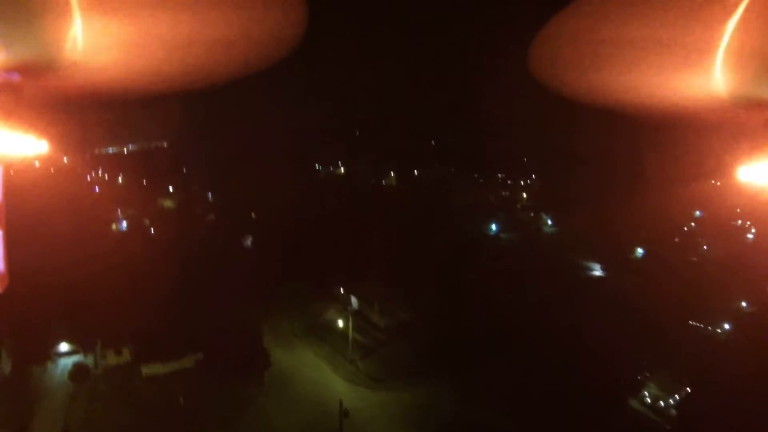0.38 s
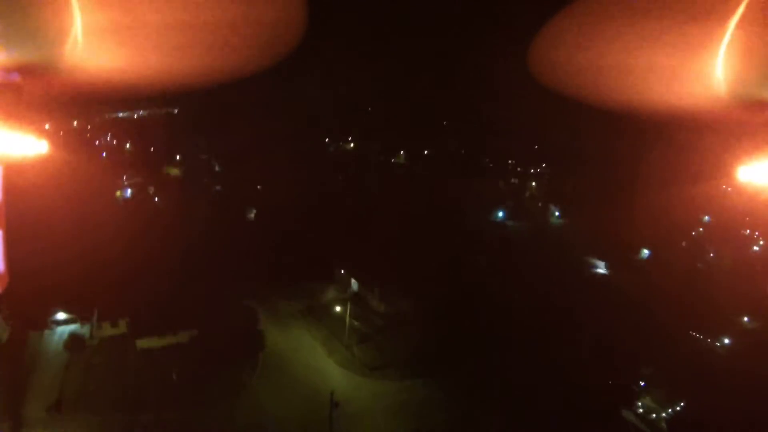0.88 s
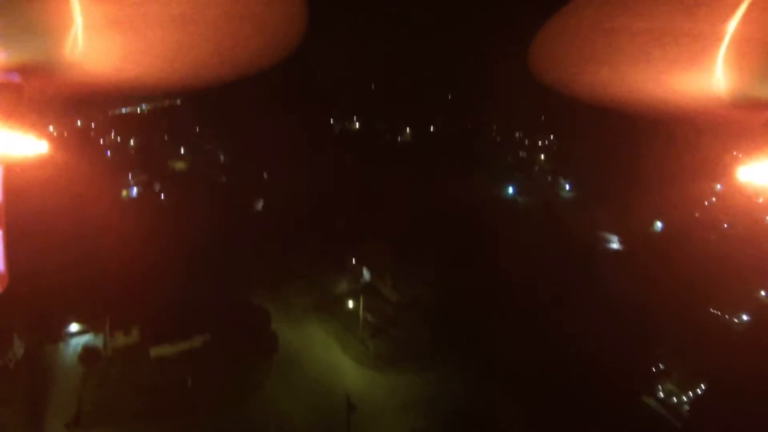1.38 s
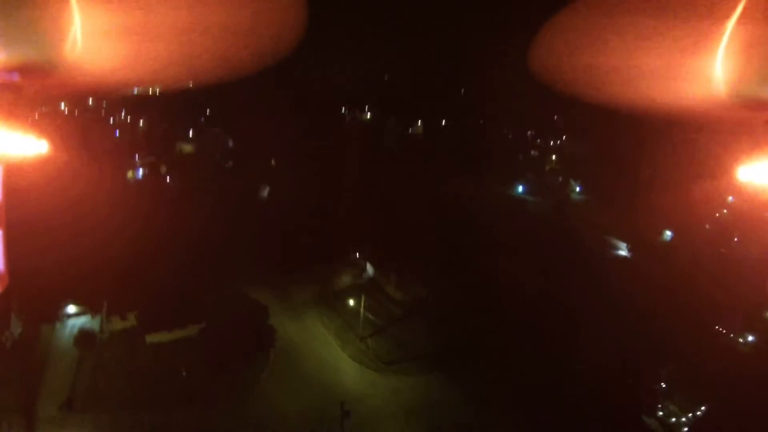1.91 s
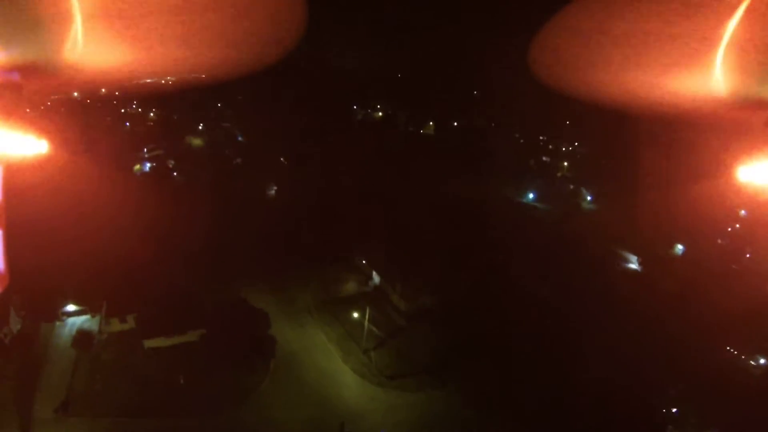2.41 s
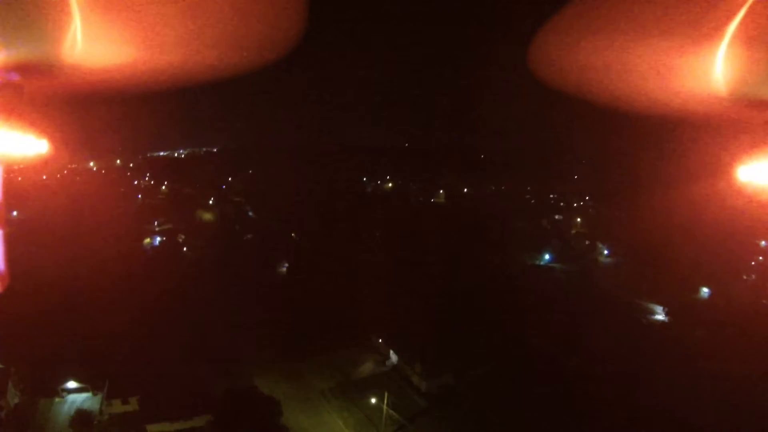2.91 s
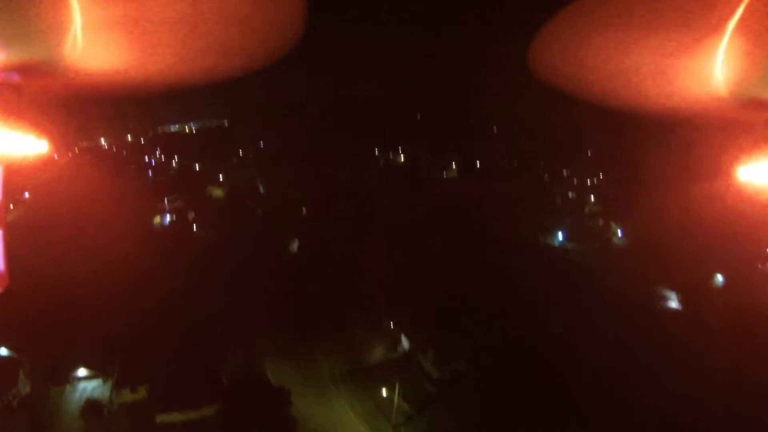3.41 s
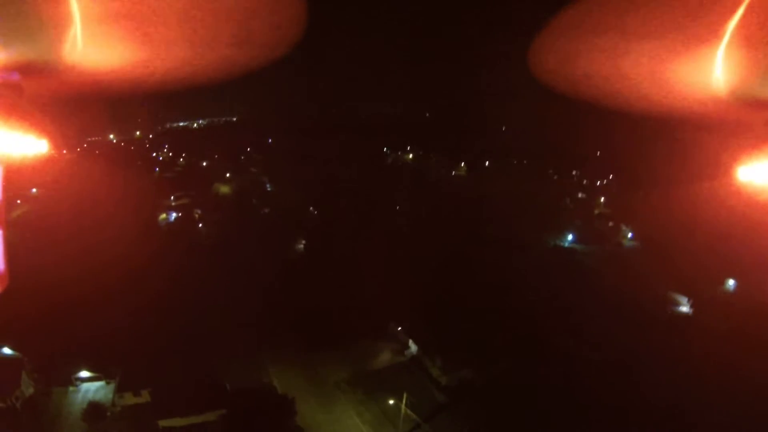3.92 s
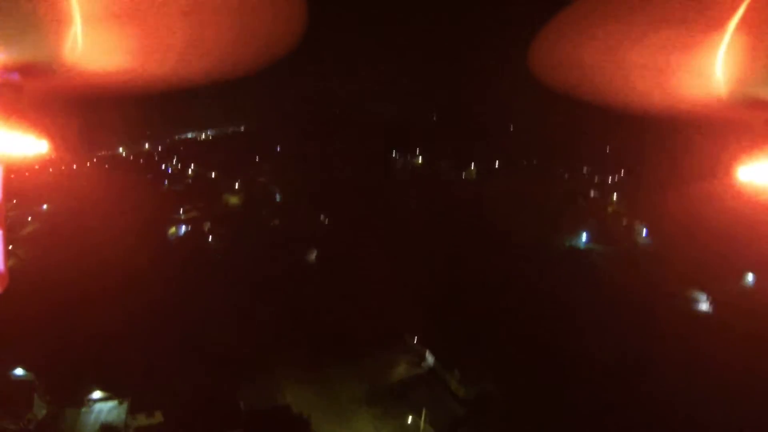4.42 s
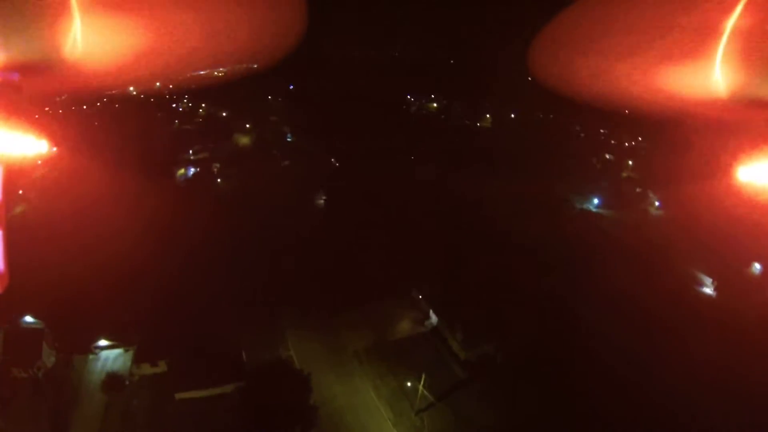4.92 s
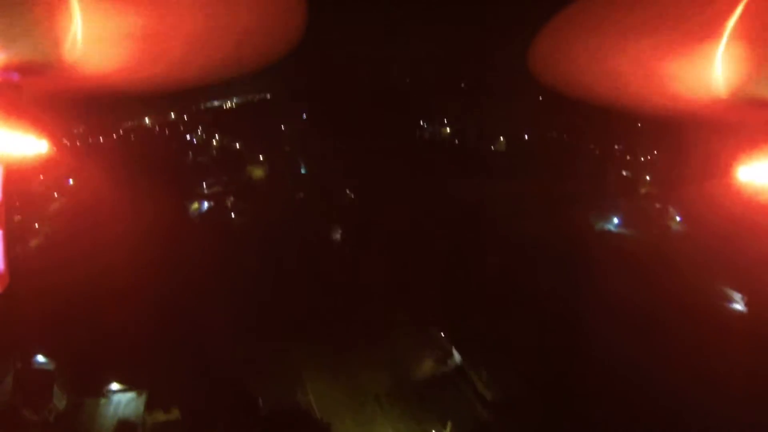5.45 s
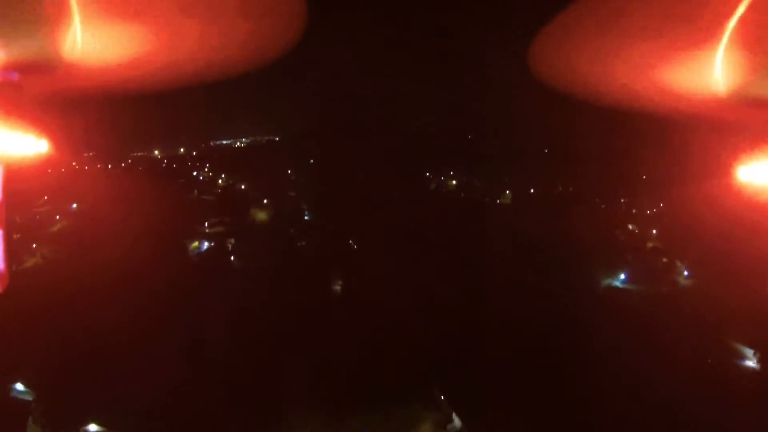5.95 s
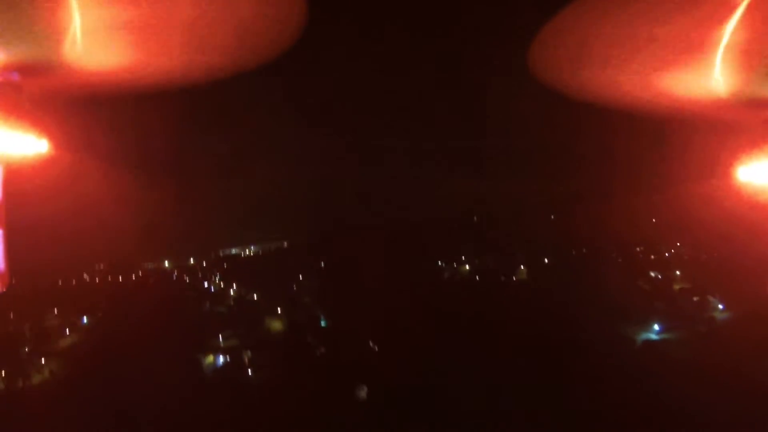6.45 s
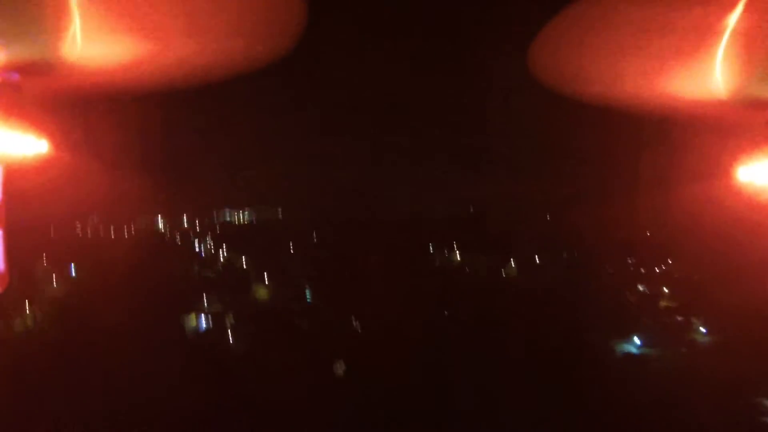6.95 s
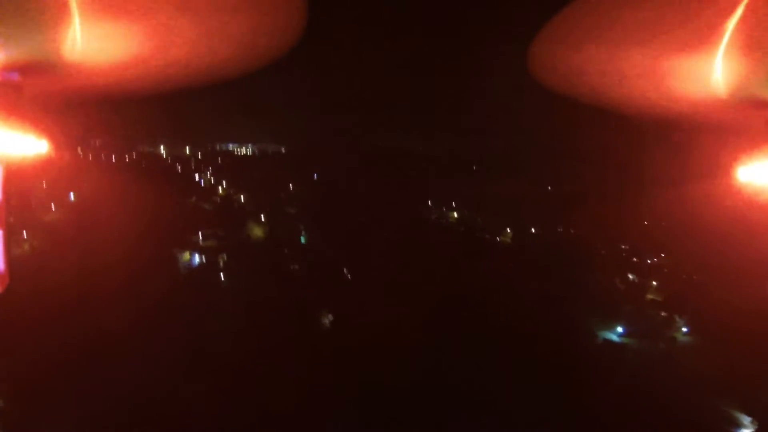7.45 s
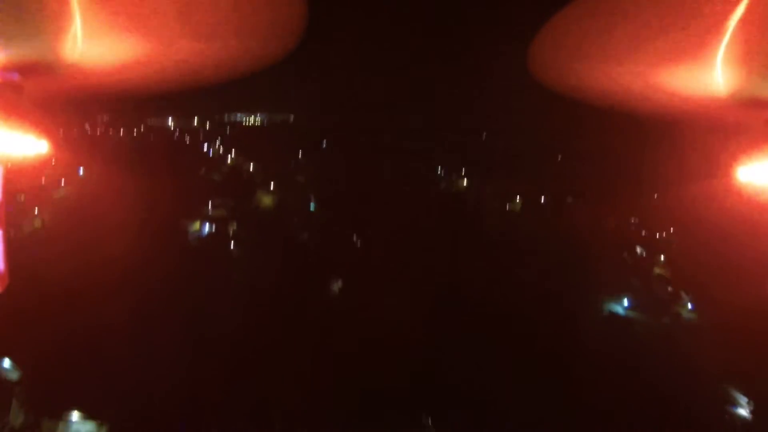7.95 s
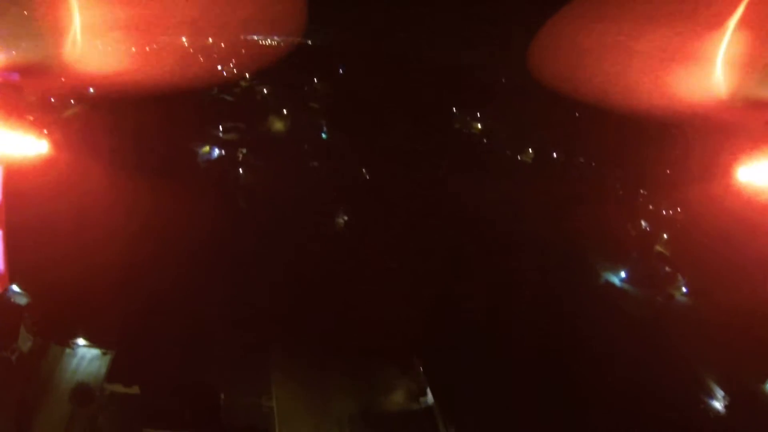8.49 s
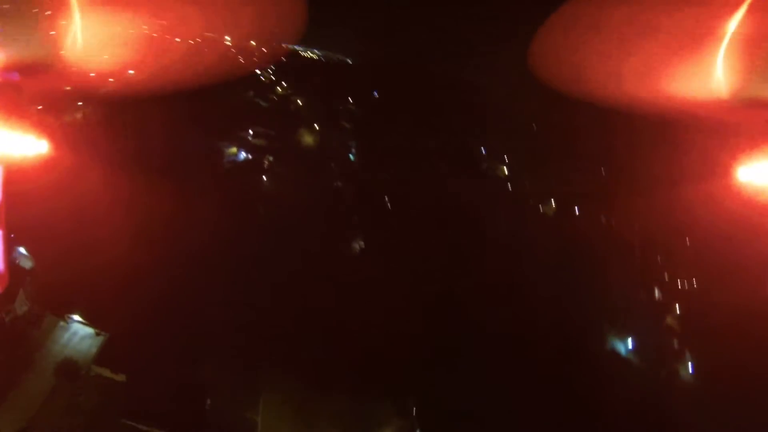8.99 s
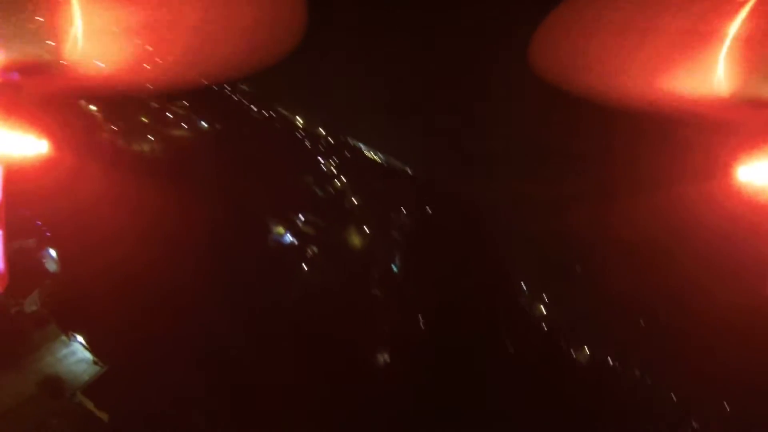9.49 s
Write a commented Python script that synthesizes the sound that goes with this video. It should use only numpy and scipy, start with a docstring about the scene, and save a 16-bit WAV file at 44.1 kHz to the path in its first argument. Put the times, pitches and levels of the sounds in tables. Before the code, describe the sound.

A small four-rotor drone flies at night, heard by a microphone mounted under its arms, very close and dry, for about 9.6 seconds. From the first instant the nearest propeller beats puffs of air on the microphone, a low buzzing throb around 130 beats a second, wavering slightly in pitch. Windy rumble, flutter and raspy wash swell and fade irregularly; the beat is smooth in calm spells and breaks up in gusts. A thin whine near 8 kHz and airy hiss rise and sink together beneath it. From about 2.7 s scattered pops appear, with more near 4.3 and 5.8 s. Around 6.4 to 6.7 s they crowd into a loud, crackling, buffeting burst, with another pop near 7. Afterwards they thin out, the whine and hiss peak near 8.5 s, a few thuds and pops follow, and the throbbing continues to the end.

```python
"""A small four-rotor drone in flight, heard by a microphone under its arms, for about 9.6 s.
From the start the nearest propeller beats a puff of air per blade on the microphone port.
Rumble, flutter and rasp swell and fade on their own; the beat is steady in calm spells and breaks up in gusts.
A whine near 8 kHz and a frame hiss come and go together, strongest near 8.5 s.
Scattered pops join from about 2.7 s, crowd together near 6.5 s, then thin out.
Puffs are summed cosines, wash and hiss shaped noise, the whine pure tones."""
import sys
import numpy as np
from scipy import signal
from scipy.fft import rfft, irfft
from scipy.io import wavfile

SR = 44100
rng = np.random.default_rng(int(sys.argv[2]) if len(sys.argv) > 2 else 0)


def store_wav(level_fs):
    """Save 16-bit WAV to argv[1]."""
    pcm = np.round(np.clip(np.atleast_2d(level_fs), -1, 1) * 32767)
    wavfile.write(sys.argv[1], SR, pcm.T.astype(np.int16))


def volts_from_decibels(level):
    """Turn decibel levels (scalar or array-like) into linear amplitude factors."""
    exponent = np.asarray(level, float) / 20
    return 10 ** exponent


N = 423801  # length in samples

# How each puff is shaped: start_s, lean_turns (0 pressure peaks, 0.25 saw, 0.5 suction dips; whole turns repeat),
# cling_db (how tightly the rasp clings to each blade), sharpness (0-1, before chance),
# wobble_db (once-a-turn wobble, before chance)
PUFF_SHAPE = [(0, 0.51, 0.86, .28, -29), (.5, 0.41, 3, 0.31, -33), (.8, 0.68, 1.8, 0.48, -41),
              (1.3, 0.56, 1.8, 0.32, -42), (1.8, 1.2, 2.6, 0.25, -34), (2.2, 0.86, 2.4, 0.27, -28),
              (2.5, 1.07, 2.9, .3, -33), (2.65, 0.91, 13, 0.36, -35), (3.02, 1.05, 7.5, 0.53, -38),
              (3.2, 0.91, 4.1, .3, -24), (3.7, 1.01, 6.4, 0.34, -32.5), (4.2, 1.4, 2.7, 0.25, -24),
              (4.6, 1.36, 1.6, .24, -30), (5.1, 1.61, 1.3, 0.15, -24), (5.55, 2.03, 7.5, .5, -28),
              (5.95, 1.96, 6, 0.55, -35), (6.1, 2.25, 4, 0.35, -39), (6.4, 1.87, 4, 0.21, -40),
              (6.52, 1.63, 7.1, .22, -31), (6.7, 1.47, 6, 0.33, -36), (6.8, 1.8, 3.5, 0.43, -24),
              (7.0, 1.94, 3, 0.34, -38), (7.4, 2.3, 3.7, 0.33, -24.5), (8.0, 2.42, 2.6, 0.44, -26),
              (8.8, 2.54, 2.7, 0.47, -27.5), (9.2, 1.8, 1.9, .25, -27), (9.6, 2.43, 2, 0.36, -30)]
# Turbulent wash, before trims and chance: start_s, rasp_db (small eddies), flutter_db (middling eddies)
WASH_LEVELS = [(0.0, -30, -28), (0.02, -34.5, -28.5), (0.43, -30.5, -24), (0.45, -34, -18.5),
               (0.53, -35, -21), (1.04, -31, -27), (1.15, -36, -29), (1.18, -24, -27), (1.23, -37, -20.5),
               (1.31, -28, -24), (1.5, -37, -22), (1.63, -37, -23.5), (1.79, -44.5, -24.5),
               (1.85, -32.5, -29), (1.98, -30, -22.5), (2.03, -33.5, -27), (2.27, -29, -19.5),
               (2.51, -35, -20.5), (2.68, -39.5, -26.5), (2.84, -38, -27), (2.89, -41.5, -28),
               (3.29, -32.5, -21), (3.56, -40, -25.5), (3.91, -34.5, -22.5), (4.36, -38, -23),
               (4.39, -36, -28), (4.68, -29, -24), (5.67, -36, -22.5), (5.91, -30, -27.5),
               (6.05, -35.5, -29.5), (6.66, -22.5, -24), (6.72, -30.5, -25), (6.74, -47, -32),
               (6.8, -36, -27), (6.9, -41, -32.5), (6.96, -33.5, -24), (7.09, -39, -30.5),
               (7.33, -35.5, -26.5), (7.49, -41.5, -31), (8.65, -42, -28.5), (8.91, -35, -25.5),
               (8.94, -38.5, -22.5), (9.13, -38.5, -30), (9.21, -30.5, -28.5), (9.58, -34.5, -24.5),
               (9.61, -35, -26.5)]


def rms_one(x):
    """Scale a signal to an rms of 1."""
    return x / np.sqrt(np.mean(x ** 2) + 1e-20)


def in_time(rows):
    """Draw straight lines between the rows of a table, one curve for each column after the time."""
    start_s, *columns = np.transpose(rows)
    return [np.interp(np.arange(N) / SR, start_s, column) for column in columns]


def drift(rate_hz):
    """Slow chance: white noise through a double one-pole low-pass; spread 1."""
    r = np.exp(-2 * np.pi * rate_hz / SR)
    slow = signal.lfilter([1], [1, -2 * r, r * r], rng.standard_normal(N + SR))
    return rms_one(slow[SR:])  # skip the first second, while the filter settles


def phase(hz):
    """Add up a changing frequency into an angle in radians."""
    return 2 * np.pi * np.cumsum(hz) / SR


def coloured(x, spectrum, weight=lambda hz: 1):
    """Filter x by a spectrum of (Hz, dB) points, times a further weight; rms 1."""
    hz = np.maximum(np.arange(N // 2 + 1) * SR / N, 1)
    point_hz, point_db = np.transpose(spectrum)
    gain = volts_from_decibels(np.interp(np.log(hz), np.log(point_hz), point_db)) * weight(hz)
    return rms_one(irfft(rfft(x) * gain, N))


def puffs(turn):
    """Two blades push two puffs a turn, sharpened at crest, flank or trough; unequal blades add a wobble."""
    # Blade tone before trim and chance: start_s, tone_db
    tone_levels = [(0.0, -30.5), (0.08, -17), (0.56, -20), (0.59, -28), (0.77, -20), (1.68, -16.5),
                   (1.79, -16), (1.87, -30), (2.17, -20.5), (2.22, -29), (2.57, -15), (3.13, -18.5),
                   (3.18, -26), (3.34, -15.5), (3.82, -16), (3.88, -36), (3.96, -17.5), (4.01, -24),
                   (4.09, -12.5), (4.15, -24), (4.34, -17), (4.39, -24), (4.66, -19), (5.3, -23.5),
                   (5.54, -14.5), (5.81, -19), (6.23, -15), (6.37, -30), (6.4, -25), (6.45, -27),
                   (6.56, -20), (6.66, -24), (7.23, -16), (7.47, -19.5), (8.32, -17.5), (8.35, -23.5),
                   (8.91, -21.5), (8.94, -22), (8.99, -14), (9.26, -29), (9.58, -15.5), (9.61, -21.5)]
    # The tone's octave, which leads the overtones, before trim and chance: start_s, octave_db
    octave_levels = [(0.0, -23.5), (0.35, -31.5), (0.4, -16), (0.7, -26.5), (1.76, -22), (1.82, -37),
                     (1.98, -20), (2.09, -44), (2.17, -23), (2.94, -19.5), (3.05, -27), (3.53, -23),
                     (3.64, -29.5), (3.77, -17.5), (3.82, -31), (3.99, -17.5), (4.01, -39), (4.28, -17.5),
                     (4.44, -35), (4.52, -26), (4.92, -30), (4.95, -38), (5.03, -21), (5.24, -32.5),
                     (5.27, -25.5), (5.94, -19.5), (6.32, -35), (6.66, -17), (6.74, -40), (6.82, -26.5),
                     (7.6, -29.5), (7.65, -23), (8.62, -21), (9.21, -34.5), (9.58, -23), (9.61, -28)]
    lean, cling_db, sharp, wobble_db = in_time(PUFF_SHAPE)
    tone_db = in_time(tone_levels)[0] + 0.35 + 1.0 * drift(16.0)
    octave_db = in_time(octave_levels)[0] - 1.5 + 2.5 * drift(4.6)
    wobble_db = wobble_db + 2.4 * drift(5.0)
    sharp = np.clip(sharp * (1 + 0.2 * drift(6.2)), 0, 0.8)

    overtones = np.zeros(N)
    for k in range(1, 5):
        overtones += sharp ** (k - 1) * np.cos((k + 1) * 2 * turn + k * 2 * np.pi * lean)
    blade = volts_from_decibels(tone_db) * np.cos(2 * turn) + volts_from_decibels(octave_db) * overtones
    wobble = np.cos(turn + 0.46 * drift(0.67)) + 0.19 * np.cos(3 * turn + drift(3.9))
    return np.sqrt(2) * (blade + volts_from_decibels(wobble_db) * wobble)


def wash(turn):
    """Eddies make lumpy noise; the small ones add sparse snaps, thickest just after each puff's sharp point."""
    # Large eddies, before trim and chance: start_s, rumble_db
    rumble_levels = [(0.0, -26.5), (1.01, -30.5), (1.07, -21), (1.31, -34), (1.36, -22.5), (1.6, -37.5),
                     (1.95, -26), (2.49, -27.5), (2.65, -46), (3.21, -28), (3.4, -43), (3.69, -33),
                     (3.77, -35), (4.01, -23), (4.07, -32.5), (5.3, -24.5), (5.62, -39), (5.7, -30),
                     (6.1, -39), (6.56, -27.5), (6.74, -30), (6.82, -22), (7.17, -29), (8.99, -23),
                     (9.07, -43), (9.15, -29), (9.39, -20), (9.45, -37), (9.5, -27), (9.61, -28)]
    # Colour of the wash, relative: pitch_hz, level_db (per Hz)
    wash_colour = [(15, -7), (25, 1), (50, 6), (100, 4.5), (200, 1.5), (310, -1.5), (500, -8.5),
                   (800, -14.5), (1250, -20.5), (2000, -28.5), (3150, -39), (5000, -50.5), (9000, -64.5)]
    rumble_top_hz, flutter_top_hz = 130, 812
    snaps_per_s = 1200  # before the blade wake thickens or thins them

    def below(hz, top_hz):
        return 1 / np.sqrt(1 + (hz / top_hz) ** 4)

    def above(hz, bottom_hz):
        return np.sqrt(1 - below(hz, bottom_hz) ** 2)

    rasp_db, flutter_db = in_time(WASH_LEVELS)
    rumble_db = in_time(rumble_levels)[0]
    lean, cling_db = in_time(PUFF_SHAPE)[:2]
    white = rng.standard_normal((3, N))

    # The wake peaks 0.7 radian after the sharp point
    wake_db = cling_db * (np.cos(2 * turn + 2 * np.pi * lean - 0.7) - 0.6)
    gusts_db = 0.72 * drift(28) + 3.7 * drift(290)
    snap_here = rng.random(N) < snaps_per_s * volts_from_decibels(wake_db) / SR
    snap_size = volts_from_decibels(2.3 * np.minimum(rng.exponential(1, N), 2.5))
    snaps = rms_one(snap_here * snap_size * np.sign(white[2]))
    eddies = white[1] * volts_from_decibels(0.44 * gusts_db + 0.62 * wake_db)
    tearing = volts_from_decibels(gusts_db + wake_db) * (snaps + 1.07 * white[1])

    rumble = coloured(white[0], wash_colour, lambda hz: below(hz, rumble_top_hz))
    flutter = coloured(eddies, wash_colour, lambda hz: above(hz, rumble_top_hz) * below(hz, flutter_top_hz))
    rasp = coloured(tearing, wash_colour, lambda hz: above(hz, rumble_top_hz) * above(hz, flutter_top_hz))

    lumps = drift(11.5)  # flutter and rasp share these chance lumps
    rumble = volts_from_decibels(rumble_db + 5.5 + 2 * drift(4.3)) * rumble
    flutter = volts_from_decibels(flutter_db + 3.5 + 1.28 * lumps) * flutter
    rasp = volts_from_decibels(rasp_db + 2.5 + 1.23 * lumps) * rasp
    return rumble + flutter + rasp


def pops(turn):
    """In a passing vortex pressure builds one way, flips across the core and relaxes; suction dips are bells."""
    # Strongest tip vortices, before the port dulls them: start_s, jump_db, direction (+1 up, -1 down)
    strong_vortices = [(2.659, -11, -1), (3.393, -11.5, -1), (3.4287, -11.5, -1), (3.8716, -11, -1),
                       (4.2748, -13, 1), (4.3083, -10.5, 1), (5.548, -13, 1), (5.787, -8, -1),
                       (5.849, -17, 1), (5.9278, -9.5, -1), (6.0065, -11, 1), (6.359, -13, 1),
                       (6.4412, -4, -1), (6.4827, -9, 1), (6.512, -3, -1), (6.52, -3, 1), (6.534, -5, -1),
                       (6.5459, -1, 1), (6.5686, -5, -1), (6.585, -2.5, -1), (6.6102, -2, -1),
                       (6.656, 0, -1), (6.7987, -15, 1), (6.9691, -5, -1), (8.6588, -11, 1),
                       (9.063, -12.5, 1), (9.071, -13, -1)]
    # Deep suction as a gust seals the port, before dulling: start_s (centre), depth_db, width_ms
    suction_dips = [(6.5473, 6, 0.53), (6.5797, -0.5, 0.89), (6.6586, -7, 0.57), (6.666, -12, 0.71),
                    (8.477, 3, 0.86), (8.6622, 0.5, 0.48), (9.182, -3, 1), (9.241, -2.5, 1),
                    (9.367, -2, 0.56), (9.504, -18, 0.48)]
    core_ms, reach_ms = 0.074, 0.72
    port_cut_hz = 3500
    shed_db, shed_per_cling = 0.5, 0.83  # small vortices against the rasp table; growth per dB of cling
    shed_spread_db, shed_jitter_ms = 7, 0.4

    rasp_db = in_time(WASH_LEVELS)[0]
    lean, cling_db = in_time(PUFF_SHAPE)[:2]
    jumps, ms = np.zeros(N), np.arange(-200, 201) / SR * 1000

    # Each blade sheds one small vortex, about 1.2 radians after the puff's sharp point
    blade_count = np.floor((2 * turn - 1.2) / (2 * np.pi) + lean)
    passes = np.flatnonzero(np.diff(blade_count) > 0)
    late, strength = rng.standard_normal((N // 200, 2))[:len(passes)].T
    at = np.clip(passes + (late * shed_jitter_ms * SR / 1000).astype(int), 0, N - 1)
    small_db = (rasp_db + shed_db + shed_per_cling * cling_db)[passes]
    jumps[at] = -volts_from_decibels(small_db + shed_spread_db * np.clip(strength, -2, 1.4))

    for start_s, jump_db, direction in strong_vortices:
        jumps[round(start_s * SR)] += np.sign(direction) * volts_from_decibels(jump_db)
    flip = np.tanh(ms / core_ms) * np.exp(-2 * np.hypot(ms, core_ms) / reach_ms)
    out = signal.fftconvolve(jumps, flip, "same")

    for start_s, depth_db, width_ms in suction_dips:
        at = round(start_s * SR)
        out[at - 200:at + 201] -= volts_from_decibels(depth_db) / np.cosh(ms / width_ms) ** 2
    # The port cavity dulls them
    return signal.sosfilt(signal.butter(2, port_cut_hz, fs=SR, output="sos"), out)


def whine(near, far):
    """Speed controllers switch at fixed pitches; motor poles add side tones that move with shaft speed."""
    # Switching tones, before trim and chance: pitch_hz, level_db (against the treble level)
    switching = [(7487, -29), (7503, -31), (7636, -28), (7652, -29), (7978, -14), (7995.5, -19),
                 (8011.7, -16), (8053.4, -4), (8069.6, -8.5), (8127.4, -18), (8143.6, -18), (8184, -28),
                 (8209.5, -29)]
    # Distance of the side tones from their carrier: order (multiples of shaft speed)
    pole_orders = [-42, -14, 14]
    # Side tones of the near and the far rotor, before chance: level_db (against the treble level), one per order
    near_side_db = [-17, -13.5, -27]
    far_side_db = [-17, -15, -27]
    near_carrier_hz, far_carrier_hz = 8053.4, 8069.6

    t = np.arange(N) / SR
    out = np.zeros(N)
    for pitch_hz, level_db in switching:
        level = volts_from_decibels(level_db + 0.5 + 2.6 * drift(4.6))
        angle = 2 * np.pi * pitch_hz * t + 0.36 * drift(2.9) + rng.uniform(0, 7.3)
        out += level * np.cos(angle)

    rotor_tones = ((near_carrier_hz, near, near_side_db), (far_carrier_hz, far, far_side_db))
    for carrier_hz, speed, side_db in rotor_tones:
        for order, level_db in zip(pole_orders, side_db):
            angle = phase(carrier_hz + order * speed) + 0.3 * drift(15)
            out += volts_from_decibels(level_db + 3.0 * drift(10)) * np.cos(angle)
    return np.sqrt(2) * out


def hiss(turn):
    """Blade-edge hiss throbs at the blade rate and is coloured by the frame's resonances."""
    # Colour of the hiss, relative: pitch_hz, level_db (per Hz)
    hiss_colour = [(880, -35), (1500, -14.5), (2760, -4), (3450, -13), (3990, -10.5), (4710, -11.5),
                   (5660, -2), (7210, -5.5), (7490, -10.5), (7790, -4.5), (8180, -4), (8580, -8.5),
                   (9640, -16.5), (13700, -22), (15200, -32)]
    # Frame resonances: pitch_hz
    resonance_hz = [4160, 5460, 5792, 6227, 6362, 7915, 11700]
    # The same resonances in order: width_hz, level_db (above the hiss)
    resonance_shape = [(220, 3), (120, 1.4), (45, 8.7), (50, 7.3), (65, 4), (70, 7.3), (220, 3)]

    def resonances(hz):
        gain = 1
        for pitch_hz, (width_hz, level_db) in zip(resonance_hz, resonance_shape):
            gain = gain + (volts_from_decibels(level_db) - 1) / (1 + (2 * (hz - pitch_hz) / width_hz) ** 2)
        return gain

    throb_db = 0.66 * np.cos(2 * turn) + 0.9 * drift(66)
    return coloured(rng.standard_normal(N) * volts_from_decibels(throb_db), hiss_colour, resonances)


def scene():
    """Turn the rotors and add up the sounds; whine and hiss swell and sink together."""
    # Shaft speeds before chance: start_s, near_rev_per_s, far_rev_per_s
    rotors = [(0, 68.2, 74.8), (.45, 64.3, 72), (.65, 65.2, 75.3), (.9, 65.1, 71.8), (1.1, 68.8, 71.6),
              (1.45, 65, 74.2), (1.8, 64.4, 74.2), (1.9, 65.7, 71.5), (2.1, 68.2, 74.8), (2.55, 67.5, 74.8),
              (2.75, 65.8, 76.6), (2.9, 65.2, 75.5), (3.2, 68.3, 74.4), (3.4, 67, 76.2), (3.75, 65.9, 74.2),
              (3.9, 67.4, 73.7), (4.25, 67.2, 76.6), (4.6, 67.3, 75), (5.3, 68.9, 75.3), (5.5, 66.3, 77.4),
              (5.9, 68, 75.2), (6.1, 66.4, 76.7), (6.35, 67, 78.2), (6.55, 64.7, 77.4), (7, 65.8, 69.2),
              (7.3, 65.5, 69.8), (7.5, 64.2, 72.8), (7.8, 65, 71.4), (8, 66.1, 70.6), (8.3, 66.3, 69.5),
              (8.5, 64.7, 71.5), (8.72, 66.4, 74.2), (9, 62.2, 71.5), (9.3, 64.7, 77.2), (9.61, 65, 76)]
    # Level shared by whine and hiss, before trims and chance: start_s, treble_db
    treble_levels = [(0.0, -44), (0.21, -41.5), (0.59, -50.5), (0.85, -39.5), (1.23, -40), (1.55, -52),
                     (1.76, -51.5), (1.98, -42), (2.01, -50), (2.09, -44), (2.51, -50.5), (2.78, -61),
                     (3.26, -50), (3.48, -59), (3.91, -50.5), (4.36, -51.5), (4.63, -41.5), (5.06, -40.5),
                     (5.22, -48), (5.27, -42), (5.3, -50.5), (5.67, -59), (5.91, -51.5), (5.97, -55.5),
                     (6.32, -50.5), (6.5, -41), (6.58, -52), (6.98, -41), (7.01, -48), (7.25, -42),
                     (8.27, -38.5), (8.46, -35), (8.51, -40), (8.96, -42.5), (8.99, -49.5), (9.13, -54),
                     (9.15, -47.5), (9.61, -42.5)]
    near, far = in_time(rotors)
    # The controllers keep trimming the speed
    near = near + 0.18 * drift(3.0)
    far = far + 0.3 * drift(2.6)
    turn = phase(near) + 0.2 * drift(10.4)  # the wake arrives a little early or late

    treble_db = in_time(treble_levels)[0] - 3.5 + 1.2 * drift(7.2)
    treble = volts_from_decibels(treble_db) * (volts_from_decibels(3.0) * hiss(turn) + whine(near, far))
    return (puffs(turn) + wash(turn) + pops(turn) + treble)[None]


def top_cut(x):
    """Nothing passes above the cut-off."""
    return signal.sosfilt(signal.butter(12, 15410, fs=SR, output="sos"), x)


def record(dry):
    """Round off the peaks near full scale."""
    rounded = 1.557 * np.tanh(dry / 1.63)
    mix = np.clip(rounded, -1, 1)
    return top_cut(mix)


dry = scene()
out = record(dry)
store_wav(out)
```